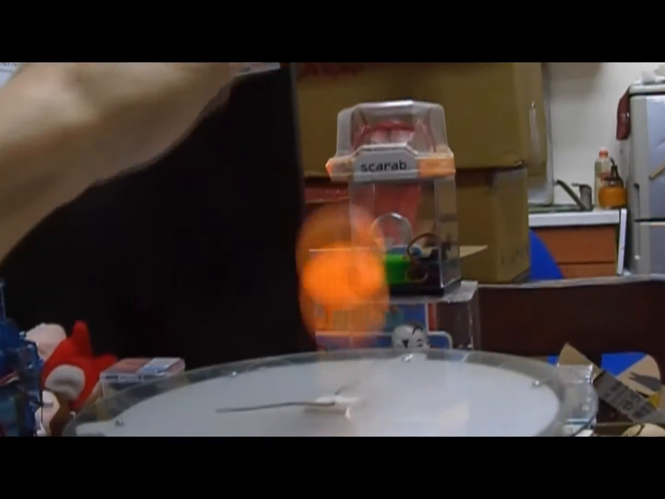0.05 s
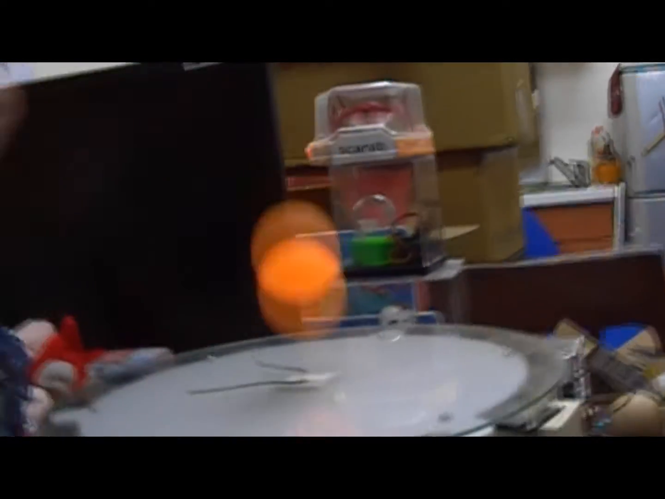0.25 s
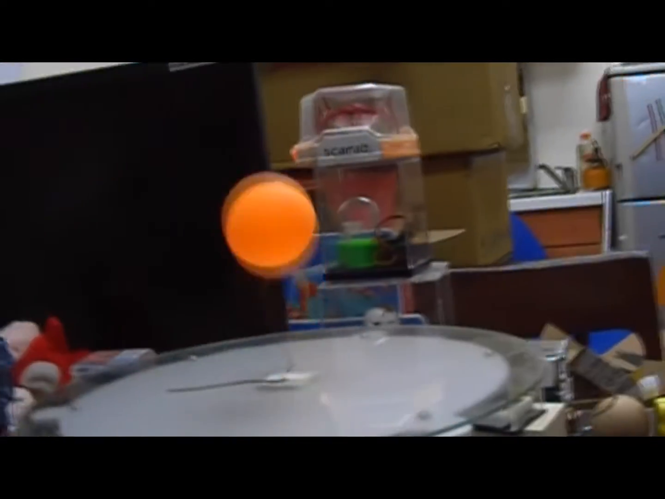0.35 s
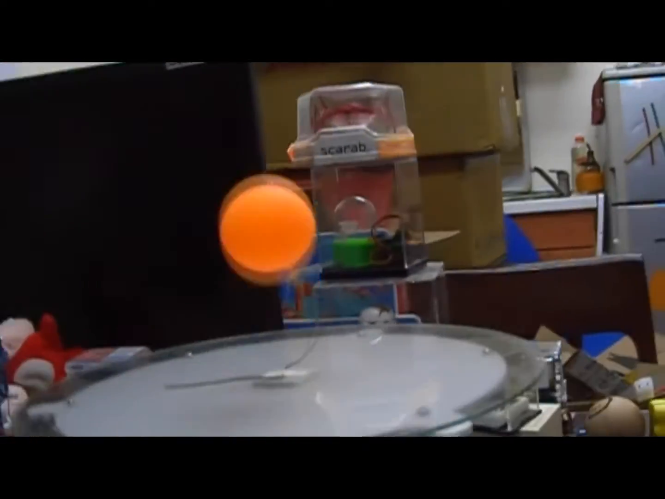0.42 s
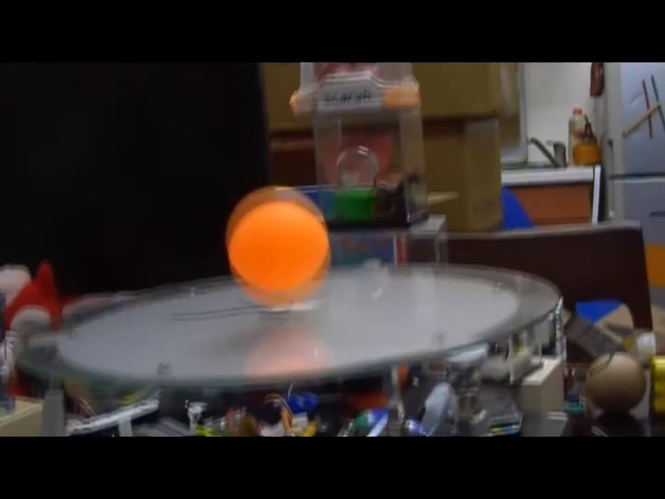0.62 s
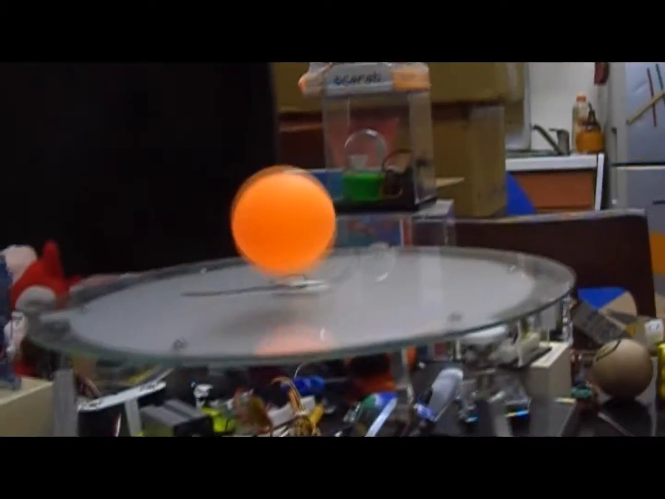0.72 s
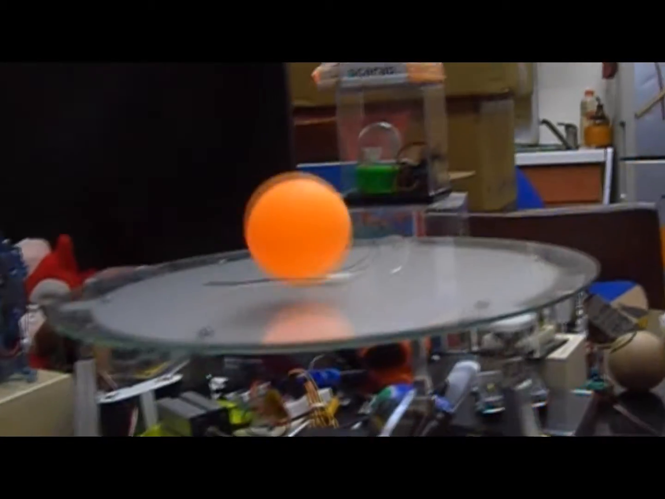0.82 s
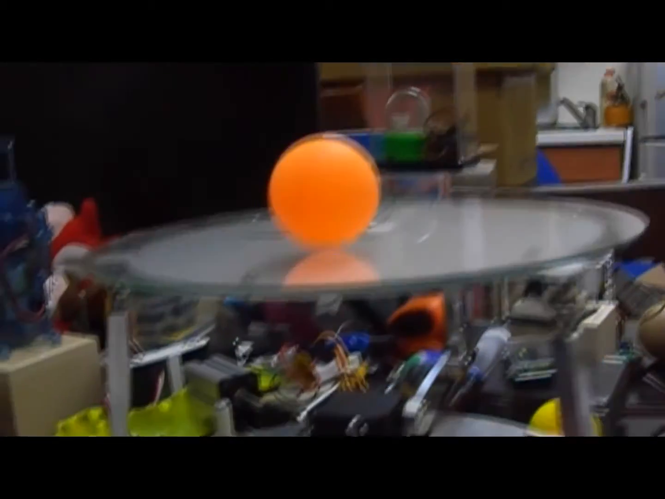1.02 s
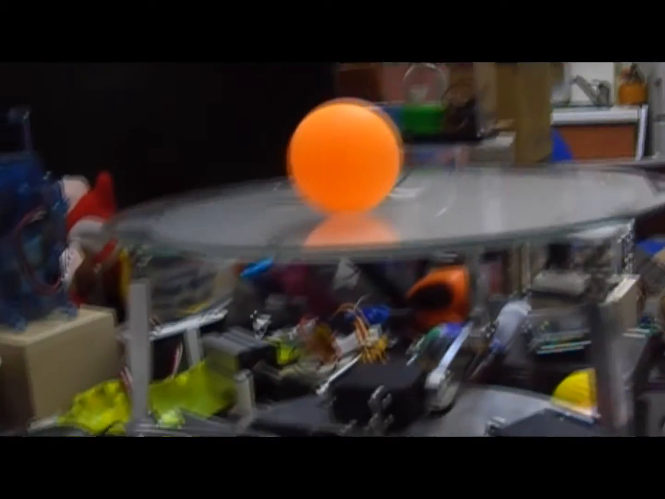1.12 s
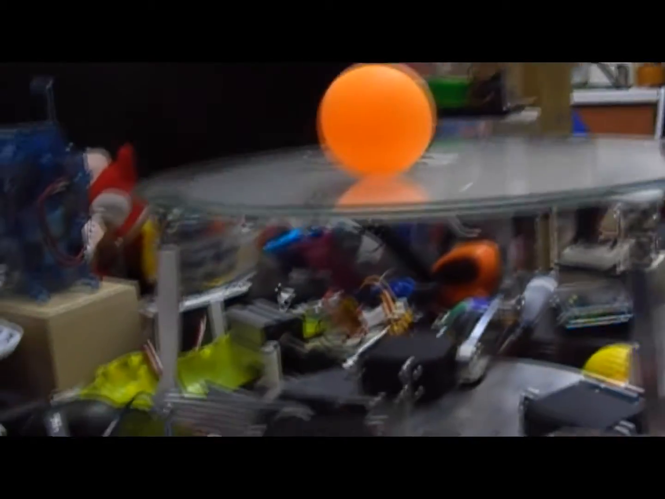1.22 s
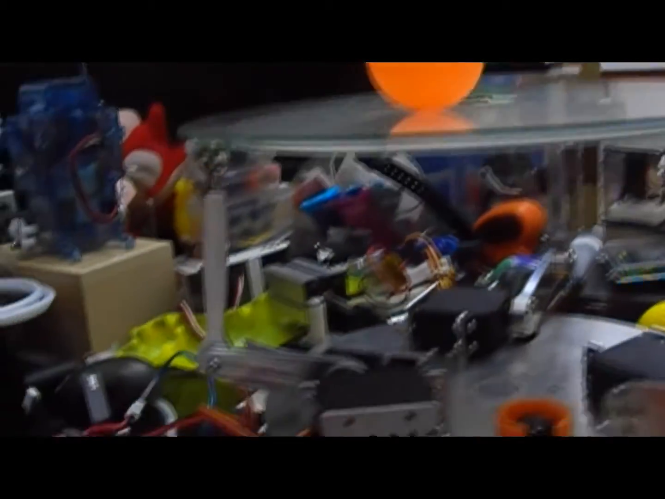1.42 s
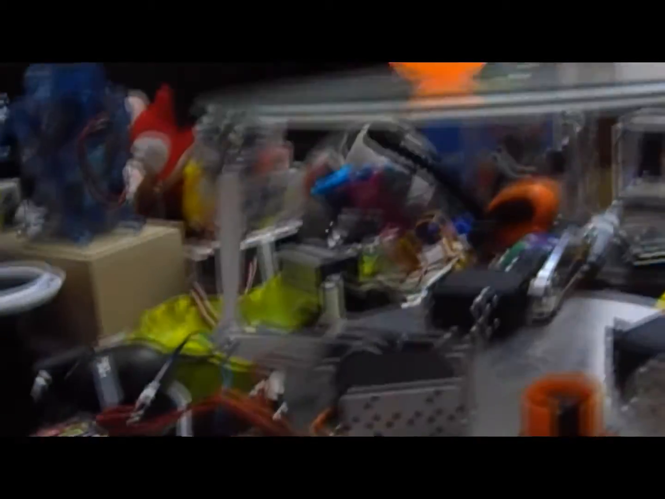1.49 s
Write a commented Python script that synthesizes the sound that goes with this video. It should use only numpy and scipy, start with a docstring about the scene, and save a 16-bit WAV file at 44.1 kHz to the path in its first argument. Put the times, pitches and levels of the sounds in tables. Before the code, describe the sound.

A table-tennis ball bounces on a glass plate, ever faster, until it settles.

```python
"""In a small workshop a table-tennis ball drops onto a round glass plate, bounces ever faster and settles.
Each bounce is a hollow knock with a bright click; the shell's ping comes back from nearby surfaces,
the glass rings on and the room answers. Behind it a fan hums with a wavering tone and a thin whine."""
import sys
import numpy as np
from scipy import signal
from scipy.fft import rfft, irfft, next_fast_len
from scipy.io import wavfile

SR = 44100
rng = np.random.default_rng(int(sys.argv[2]) if len(sys.argv) > 2 else 0)


def write(x):
    x = np.atleast_2d(x).T
    wavfile.write(sys.argv[1], SR, np.round(np.clip(x, -1, 1) * 32767).astype(np.int16))


N = 68355
RESPONSE_SAMPLES = next_fast_len(int(0.36 * SR))

# Stereo width of contact noise and reflections. Each row: frequency in Hz, side minus mid in dB.
BOUNCE_WIDTH = [(150, -18), (400, -12), (800, -15), (2000, -10.5), (4000, -13), (7000, -9), (8800, 0.5),
                (11000, -1.5), (15000, 2)]


def contacts():
    """Impulse trains of the ball's landings: click, knock, thud, ping, low and high glass ring."""
    # Each row: start in seconds, then click, knock, thud, ping, low glass and high glass levels in dB.
    bounces = [(0.2096, 1, -3.5, -4, -3.5, -13.5, -22.5), (.4630, -11.5, -20, 2.5, 4.5, -19, -24.5),
               (0.6741, -1, -1, -3, 2, 1, -3.5), (0.8223, -1, 0, -13, 1, 0, 1),
               (0.9369, -2.5, -0.5, -12, -1, 0.5, 2.5), (1.0244, -6.5, -4.5, -11, -2.5, 0.5, 0),
               (1.0925, -9, -7.5, -11, -4, -6.5, -4.5), (1.1495, -10.5, -10, -15, -9.5, -6, -6.5),
               (1.1950, -18.5, -13, -15.5, -7, -9, -10), (1.2293, -17.5, -13.5, -18, -45, -10.5, -16),
               (1.2580, -20.5, -17, -47, -47, -8.5, -21), (1.2795, -27, -25, -19, -52, -5.5, -22.5)]
    # Last tiny hops. Each row: start in seconds, click level in dB.
    last_hops = [(1.2924, -33.5), (1.3024, -33.5), (1.3110, -39), (1.3184, -35.5), (1.3260, -36),
                 (1.3346, -45), (1.3427, -43), (1.351, -45), (1.359, -72.5)]
    hop_knock_db, hop_low_db = 9, 7  # relative to the hop's click
    starts_s, *levels_db = np.transpose(bounces)
    click, knock, thud, ping, low, high = [strikes(starts_s, db) for db in levels_db]
    hops = strikes(*np.transpose(last_hops))
    knock += from_db(hop_knock_db) * hops
    low += from_db(hop_low_db) * hops
    return click + hops, knock, thud, ping, low, high + hops


def ball(click, knock, thud):
    """Direct impact: a crack of contact noise and the damped modes of click, hollow knock and dull thud."""
    # Each row: frequency in Hz, level in dB, T60 in seconds.
    click_modes = [(5520, -25, 0.006), (7350, -9.5, 0.0065), (8474, -8.5, 0.013), (9530, -16.5, 0.015),
                   (11000, -14.5, 0.0057), (11600, -37, 0.0088)]
    knock_modes = [(756, -15.5, 0.0066), (1090, -13, 0.0086), (1371, -22, 0.016), (1619, -17, 0.017),
                   (2180, -8.5, 0.012), (3636, -13.5, 0.0059), (4000, -24.5, 0.048)]
    thud_modes = [(389, -21.5, 0.01), (640.5, -15, 0.026), (815, -4.5, 0.0056), (1126, -8, 0.0097)]
    # Each row: frequency in Hz, relative spectral density in dB.
    crack_colour = [(150, -23), (600, -16), (2200, -7.5), (2900, -12), (3700, -19.5), (4500, 7), (5500, 8),
                    (9000, 1), (12000, 5.5), (16000, -19)]
    crack_db, crack_t60_s, side_db = -13.5, 0.015, -11
    hiss = noise(spectrum(crack_colour, RESPONSE_SAMPLES), RESPONSE_SAMPLES)
    crack = from_db(crack_db) * hiss * fade(crack_t60_s, size=RESPONSE_SAMPLES)
    mid = crack.mean(axis=0)
    crack = mid + from_db(side_db) * (crack - mid)
    bright = ring(click, click_modes) + convolve(click, crack)
    return pan_left(bright, db=1.5) + ring(knock, knock_modes) + ring(thud, thud_modes)


def shell_ping(hits):
    """The shell's ring returns from nearby surfaces as distinct echoes over a dying wash."""
    # Each row: frequency in Hz, relative spectral density in dB.
    ping_colour = [(2500, -19.5), (4400, -15), (5400, -10), (5900, -5), (6400, -4), (7000, -2), (7700, -7),
                   (8500, -6), (9500, -14), (11000, -19.5), (15000, -35)]
    # Each row: delay after the bounce in seconds, level in dB.
    echoes = [(.0062, -15.5), (.0088, -16), (.0112, -22), (0.02, -48), (.0225, -33)]
    wash_db, wash_t60_s, wash_delay_s, echo_t60_s = -19.5, 0.1, 0.0041, 0.016
    power = (from_db(wash_db) * fade(wash_t60_s, wash_delay_s, RESPONSE_SAMPLES)) ** 2
    for delay_s, db in echoes:
        power += (from_db(db) * fade(echo_t60_s, delay_s, RESPONSE_SAMPLES)) ** 2
    envelope = np.sqrt(np.abs(convolve(hits ** 2, power[None])))
    colour = spectrum(ping_colour)
    colour /= np.sqrt(np.mean(colour ** 2))
    return irfft(rfft(noise(1) * envelope) * colour, N)


def plate(low_hits, high_hits):
    """The glass rings from bounce to bounce until the resting ball damps it."""
    # Each row: frequency in Hz, level in dB, T60 in seconds.
    low_modes = [(535, -54, 0.14), (677.7, -22.5, 0.29), (1184, -25, 0.46), (1574, -38, 0.1),
                 (1845, -38, 0.22), (1920, -45, 0.25), (2126, -58, 0.12)]
    high_modes = [(2870, -26.5, 0.07), (2910, -36.5, 0.11), (3767, -17, 0.12), (5010, -33, 0.067),
                  (5970, -44, 0.1), (6638, -35.5, 0.11), (7000, -43, 0.16), (7940, -41, .18)]
    rest_s, damping_t60_s = 1.346, 0.26
    resting_s = np.maximum(np.arange(N) / SR - rest_s, 0)
    damping = np.exp(-np.log(1000) * resting_s / damping_t60_s)
    return (ring(low_hits, low_modes) + ring(high_hits, high_modes)) * damping


def grazes():
    """Two light, dry grazing ticks just before the dull second landing."""
    # Each row: frequency in Hz, relative spectral density in dB.
    tick_colour = [(300, -5), (2000, 1.5), (4500, -11), (7500, 2.5), (10000, -5.5), (16000, -9)]
    t60_s = 0.013
    first = from_db(-38.5) * fade(t60_s, delay_s=0.429)
    second = from_db(-19) * fade(t60_s, delay_s=0.4369)
    return noise(spectrum(tick_colour)) * (first + second)


def room(sound):
    """Early scatter from the clutter on the bench, and a tail that dies band by band."""
    # Each row: centre in Hz, gain in dB, tail T60 in seconds.
    bands = [(100, -29, 0.43), (187, -5.5, 0.5), (404, -6.5, 0.18), (636, 0, 0.2), (1080, -14.5, 0.27),
             (1506, 6, 0.27), (2190, -6, 0.27), (2400, -7.5, 0.33), (3100, -0.5, 0.24), (4300, -7, 0.34),
             (4420, -7, 0.42), (4840, 0, 0.24), (6020, -11, 0.33), (9100, -8, 0.27), (10470, -6, 0.3),
             (14900, -13.5, 0.17)]
    # The room's share falls as the microphone moves in. Each row: time in seconds, gain in dB.
    send_curve = [(0.208, 3.5), (0.469, 0), (.7, -1)]
    delay_s, early_db, early_t60_s = 0.0023, -3, 0.12
    size = RESPONSE_SAMPLES
    white = rfft(noise(1, size))
    log_centres = np.log([row[0] for row in bands])
    early_power = fade(early_t60_s, delay_s, size) ** 2
    early_power *= from_db(early_db) ** 2 / early_power.sum()
    response = 0
    for (_, db, t60_s), selector in zip(bands, np.eye(len(bands))):
        band = irfft(white * np.interp(np.log(bins_hz(size) + 1), log_centres, selector), size)
        tail_power = fade(t60_s, delay_s, size) ** 2
        response += from_db(db) * band * np.sqrt(tail_power / tail_power.sum() + early_power)
    send_db = np.interp(np.arange(N) / SR, *np.transpose(send_curve))
    return convolve(from_db(send_db) * sound, response)


def workshop():
    """Steady air noise, the fan's wavering tones and a thin electric whine, slightly left."""
    # Each row: frequency in Hz, bandwidth in Hz, level in dB.
    fan_tones = [(738.3, 42, -49), (765, 26, -58.5), (2945, 140, -62.5), (236, 50, -64), (111, 4.9, -73)]
    # Each row: frequency in Hz, relative spectral density in dB.
    air_colour = [(15, -56), (25, -23), (114, -19.5), (195, -17.5), (242, -18.5), (326, -22), (451, -15.5),
                  (660, -20.5), (755, -14.5), (890, -18), (2000, -26), (3080, -29.5), (6400, -36.5),
                  (8200, -37.5), (10000, -44.5), (16000, -63.5)]
    # Each row: frequency in Hz, side minus mid in dB.
    fan_width = [(100, 2), (800, -18), (3000, -10)]
    air_width = [(60, -3.5), (130, -1.5), (290, 2), (640, -3.5), (1410, -2), (3100, -6.5), (6820, -2),
                 (15000, -1)]
    air_db, whine_db, whine_hz = -51, -66.5, 7820
    fan = 0
    for hz, bandwidth_hz, db in fan_tones:
        peak = 1 / (1 + (2 * (bins_hz() - hz) / bandwidth_hz) ** 2)
        fan += from_db(db) * noise(peak, width=fan_width)
    whine = from_db(whine_db) * np.sqrt(2) * np.sin(2 * np.pi * whine_hz * np.arange(N) / SR)
    air = from_db(air_db) * noise(spectrum(air_colour), width=air_width)
    return pan_left(air + fan + whine, db=0.35)


def from_db(db):
    """Decibels to gain."""
    return 10 ** (np.asarray(db) / 20)


def pan_left(sound, db):
    """Left channel up by db, right channel down by db."""
    return sound * from_db([[db], [-db]])


def bins_hz(size=N):
    """FFT bin frequencies."""
    return np.arange(size // 2 + 1) * SR / size


def spectrum(points, size=N):
    """Gain per bin from (Hz, dB) points, interpolated in log frequency."""
    hz, db = np.transpose(points)
    return from_db(np.interp(np.log(bins_hz(size) + 1e-9), np.log(hz), db))


def noise(gain, size=N, width=BOUNCE_WIDTH):
    """Stereo noise of rms 1, shaped by a gain per bin and a width table."""
    spread = spectrum(width, size)
    mid, side = np.exp(2j * np.pi * rng.random((2, size // 2 + 1)))
    stereo = irfft(gain * (mid + spread * side * [[1], [-1]]) / np.hypot(1, spread), size)
    return stereo / stereo.std()


def fade(t60_s, delay_s=0, size=N):
    """Envelope that jumps to 1 after a delay and decays exponentially."""
    age_s = np.arange(size) / SR - delay_s
    return (age_s >= 0) * np.exp(-np.log(1000) * np.clip(age_s / t60_s, 0, 10))


def strikes(starts_s, levels_db):
    """One impulse per contact."""
    hits = np.zeros(N)
    np.add.at(hits, (starts_s * SR).astype(int), from_db(levels_db))
    return hits


def convolve(sound, response):
    """Convolution per channel, cut to N samples."""
    return signal.fftconvolve(np.atleast_2d(sound), response, axes=1)[:, :N]


def ring(hits, modes):
    """Impulses excite one decaying sine per mode, with alternating signs."""
    ringing = 0
    for k, (hz, db, t60_s) in enumerate(modes):
        radius, angle = np.exp(-np.log(1000) / (t60_s * SR)), 2 * np.pi * hz / SR
        feedback = [1, -2 * radius * np.cos(angle), radius ** 2]
        ringing += (-1) ** k * from_db(db) * signal.lfilter([0, np.sin(angle)], feedback, hits + 1e-18)
    return ringing


def scene():
    """Ball and glass, their reverberation and the background."""
    ping_send_db, glass_send_db = -3, -11
    radiation_hz = 207  # small bodies radiate little below this
    click, knock, thud, ping, low, high = contacts()
    direct, shell, glass = ball(click, knock, thud), shell_ping(ping), plate(low, high)
    send = (direct + from_db(ping_send_db) * shell).mean(axis=0) + from_db(glass_send_db) * glass
    bouncing = direct + shell + glass + grazes() + room(send)
    highpass = signal.butter(3, radiation_hz, "high", fs=SR, output="sos")
    return signal.sosfilt(highpass, bouncing) + workshop()


def record(dry):
    """Soft clipping, then a steep low-pass."""
    stopband_hz = 16500
    lowpass = signal.cheby2(12, 70, stopband_hz, fs=SR, output="sos")
    return signal.sosfilt(lowpass, np.tanh(dry))


dry = scene()
out = record(dry)
write(out)
```